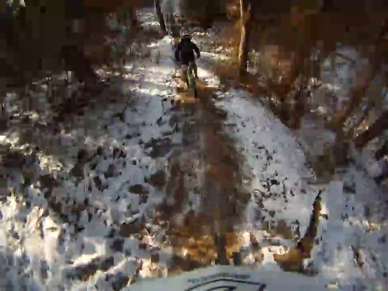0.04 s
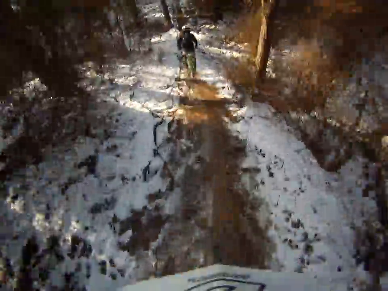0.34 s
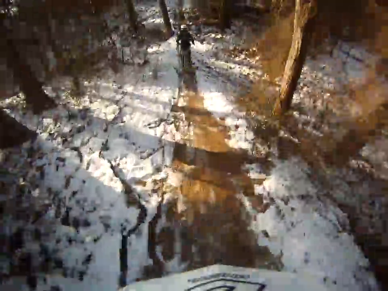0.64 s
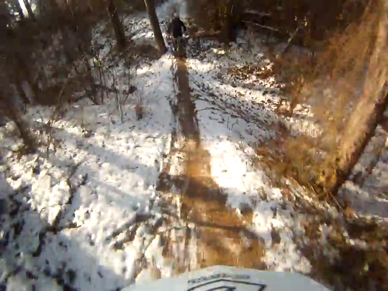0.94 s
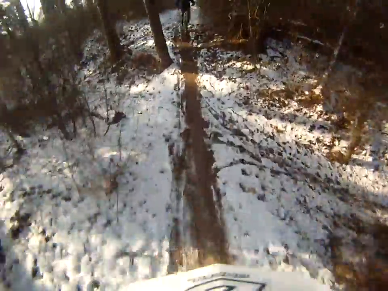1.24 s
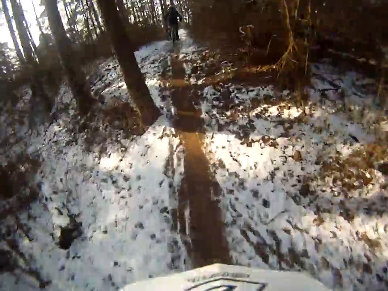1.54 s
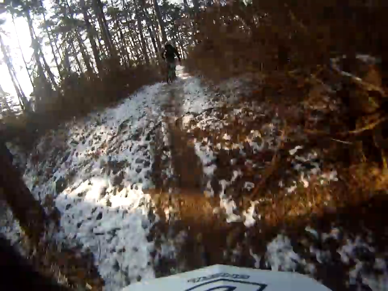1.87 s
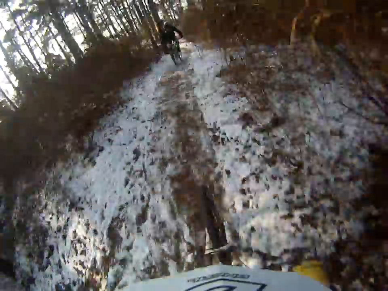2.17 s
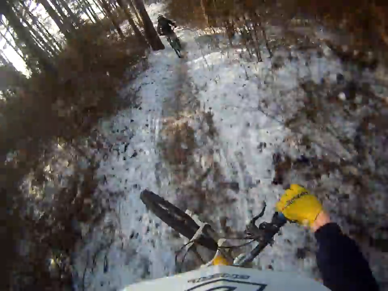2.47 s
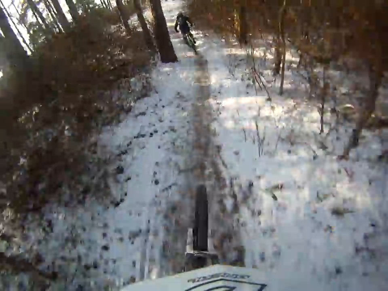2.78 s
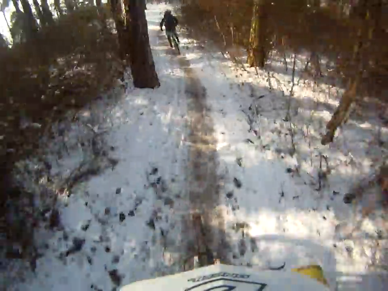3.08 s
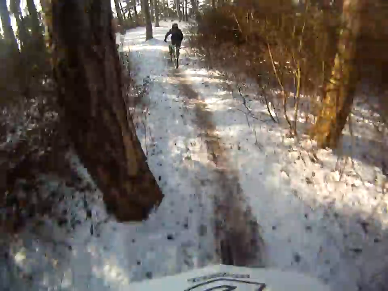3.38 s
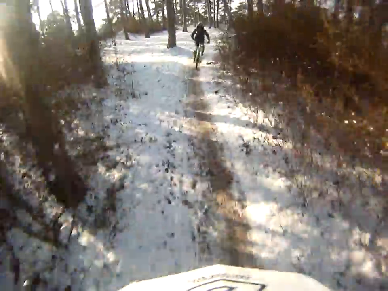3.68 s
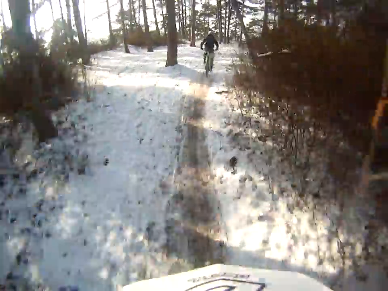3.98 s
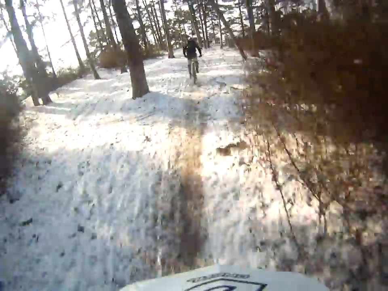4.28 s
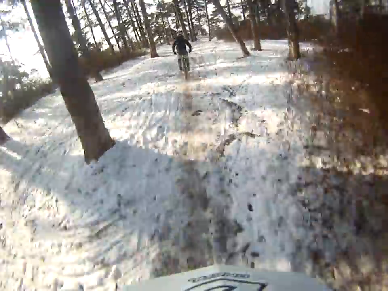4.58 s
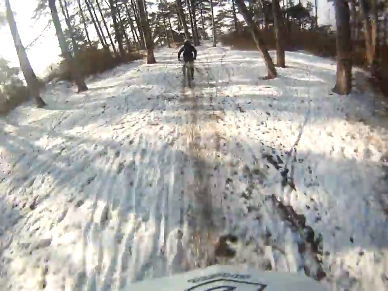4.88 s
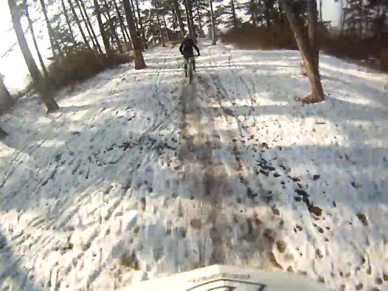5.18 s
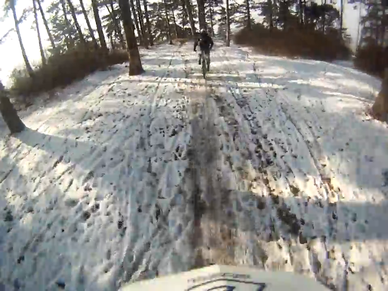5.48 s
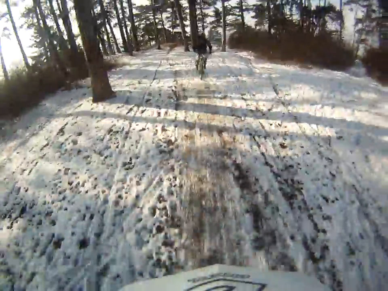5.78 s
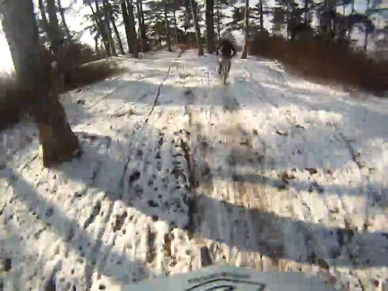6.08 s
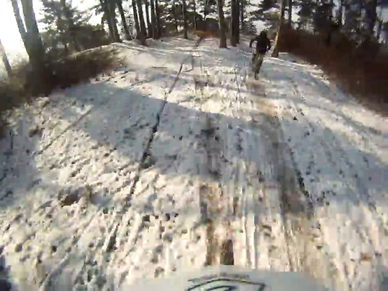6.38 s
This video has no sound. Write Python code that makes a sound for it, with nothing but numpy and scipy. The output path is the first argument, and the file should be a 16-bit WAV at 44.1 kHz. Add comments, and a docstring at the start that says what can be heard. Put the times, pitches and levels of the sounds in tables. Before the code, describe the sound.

A mountain bike rolls over snow with hissing tyres, rushing wind, low buffeting and a brief burst of very loud knocks.

```python
"""A mountain bike runs down a snowy trail, heard from a camera in a plastic housing on the helmet.
At first wind and tyre hiss ring thinly in the housing, filling out as the bike gathers speed. Knocks
and bumps follow, the mount shakes at a low rate, eddies buffet the helmet and frozen snow crunches.
Near 2.3 s a hard rattle overloads the converter, whose slow sample-and-hold mirrors all sound into
the treble. The level dips briefly, then the rush returns and the ride runs on at speed."""
import sys
import numpy as np
from scipy import signal
from scipy.fft import rfft, irfft, next_fast_len
from scipy.io import wavfile
from scipy.ndimage import map_coordinates

SR = 44100
rng = np.random.default_rng(int(sys.argv[2]) if len(sys.argv) > 2 else 0)


def materialize(psi):
    """Save the field psi as 16-bit PCM at rate SR to the path in sys.argv[1].

    A 1-D psi becomes a single channel; in a 2-D psi each row is a channel.
    """
    bounded = np.clip(np.atleast_2d(psi).T, -1, 1)
    quanta = np.round(bounded * 32767).astype(np.int16)
    wavfile.write(sys.argv[1], SR, quanta)


N = 292383


# resonances of the housing: pitch_hz, density_db
HOUSING_SPECTRUM = [(300, -31), (750, -16.5), (1000, -7.5), (1250, -1), (1600, -5.5), (1900, -0.5),
                    (2150, 2.5), (2450, -6), (2850, -19), (3150, -18), (3480, -9.5), (4000, -26),
                    (5200, -23.5), (6000, -35)]
# riding speed: time_s, speed_fraction
SPEED = [(0, 0.3), (.7, 0.44), (1.2, 1)]

def rush():
    """Cavity resonance: the housing colours smooth wind hiss and the fine grain of rolling tyres."""
    speed, = curves(SPEED)
    hiss = noise(HOUSING_SPECTRUM) * amp(0.89 * wobble(35))
    tread = coloured(grains(rate_hz=1500, spread_db=4), HOUSING_SPECTRUM)
    tread *= amp(1.4 * wobble(55) + 2.7 * wobble(19))
    full = unit(hiss + amp(-8) * tread)
    thin = unit(focused(full, centre_hz=2470, depth_db=10.5, octaves=0.7))
    return dip() * amp(rush_level() + 0.19) * (speed * full + (1 - speed) * thin)


# strength of the rush of air and tyres: time_s, level_db
RUSH_LEVELS = [(0, -57.0), (0.1, -52.5), (0.45, -49), (0.66, -50), (0.9, -46), (1.15, -38), (1.55, -36),
               (1.85, -39.5), (2.26, -41.5), (2.57, -44), (2.71, -48), (2.87, -40), (3.12, -42),
               (3.45, -39.0), (4.3, -37.5), (5.0, -37.5), (5.8, -37.5), (6.63, -38.5)]
# rougher stretches: middle_s, lift_db, half_width_s
SURGES = [(.79, 5, 0.06), (1.37, 1, 0.044), (1.65, 4, 0.038), (3.54, 1.5, .05), (4.74, 0.5, .1),
          (5.29, 2.5, 0.087), (5.68, 2.5, 0.099), (5.99, 2, 0.082), (6.32, 2, .04), (6.49, 2.5, 0.048)]

def rush_level():
    """Flow and rolling noise rise with speed and surge on rough ground; their level in dB."""
    t = np.arange(N) / SR
    surges_db = sum(lift_db * np.exp(-((t - s) / width) ** 2) for s, lift_db, width in SURGES)
    return curves(RUSH_LEVELS)[0] + surges_db


# knocks from the bike: start_s, level_db, chatter_s, centre_hz
KNOCKS = [(0.0586, -36, 0.0042, 2400), (0.132, -24, .003, 2300), (.205, -36, .003, 2400),
          (.424, -35, 0.0051, 2300), (0.713, -29.5, .008, 2200), (0.976, -30.5, .005, 2200),
          (1.026, -22, 0.0086, 1350), (1.059, -14, 0.0052, 1430), (1.363, -25.5, .006, 1800),
          (2.273, 9, .003, 1310), (2.276, 7.5, 0.0033, 2900), (2.2965, -17.5, 0.0073, 1700),
          (2.3175, 4.5, 0.0036, 3400), (2.3195, -6.5, 0.0015, 1790), (2.338, -25.5, 0.013, 1900),
          (2.363, -8, 0.0064, 2200), (2.372, -20.5, 0.0057, 1890), (2.384, -14, 0.0033, 1900),
          (2.394, -14, 0.0054, 1495), (2.98, -20.5, 0.0042, 1500), (2.9872, -13, 0.0012, 1480),
          (3.05, -24, 0.0027, 1490), (4.682, -21.5, 0.0039, 2300)]
# modes that a knock excites: pitch_hz, level_db, t60_s
KNOCK_MODES = [(640, -15.5, 0.014), (857, -25, 0.089), (1130, -2.5, 0.032), (1270, -15, 0.0084),
               (1548, 3.5, 0.014), (1986, -8.5, 0.025), (2400, -7, 0.027), (3463, -10.5, 0.024),
               (3646, -16.5, 0.032), (5300, -22, .015)]
# chatter within a knock: pitch_hz, density_db
CHATTER_SPECTRUM = [(300, -20.5), (650, -18.5), (900, -20.5), (1100, -0.5), (1600, -1.5), (2250, 1.5),
                    (2800, -17.5), (3450, -5), (4300, -15), (6000, -22.5)]

def knocks():
    """Impact excitation: damped modes ring, the contact chatters, the struck spot favours one band."""
    track, t = np.zeros(N), np.arange(SR // 10) / SR
    chatter = noise(CHATTER_SPECTRUM)
    hz, mode_db, t60 = np.transpose(KNOCK_MODES)[:, :, None]
    attack = 1 - np.exp(-t / 0.00029)
    for start_s, level_db, chatter_s, centre_hz in KNOCKS:
        strength = amp(mode_db + rng.standard_normal(hz.shape)) * rng.choice([-1, 1], hz.shape)
        modes = strength * np.sin(2 * np.pi * hz * t) * amp(-60 * t / t60)
        ring = attack * modes.sum(axis=0)
        rattle = hold_and_decay(t, chatter_s, t60_s=0.017) * chatter[round(start_s * SR):][:len(t)]
        padded = np.pad(amp(-3.5) * ring + amp(-5) * rattle, (len(t), 0))
        clack = focused(padded, centre_hz)[len(t):]
        add(track, start_s, amp(level_db) * clack)
    return track


# hard blows that reach the housing: start_s, level_db, pitch_hz
THUDS = [(1.027, -24.5, 400), (2.273, 3, 560), (2.3185, 0.5, 250), (2.363, -23, 500), (2.9872, -20, 250)]

def thuds(t60_cycles=2.1):
    """Heavy damping: the housing answers a hard blow with a dull thump of about two cycles."""
    track, t = np.zeros(N), np.arange(SR // 10) / SR
    for start_s, level_db, pitch_hz in THUDS:
        cycles = pitch_hz * t
        thump = np.sin(2 * np.pi * cycles) * amp(-60 * cycles / t60_cycles)
        add(track, start_s, amp(level_db) * thump)
    return track


# bumps in the trail: start_s, level_db, length_s
BUMPS = [(.63, -27, .02), (1.03, -22.5, 0.057), (1.28, -24.5, 0.021), (1.57, -30, 0.098),
         (1.93, -25.5, 0.017), (2.07, -26.5, 0.093), (2.91, -14.5, 0.096), (4.03, -27, 0.037),
         (4.72, -22.5, 0.02), (5.09, -26, 0.025), (5.28, -28.5, 0.06), (5.78, -27, .04), (6.33, -23, 0.025)]
# irregular sway of the mount: pitch_hz, density_db
SWAY_SPECTRUM = [(5, 0.5), (18, -4.5), (30, -13), (42, -15.5), (60, -7), (120, -61)]

def mount(natural_hz=31.5):
    """Forced vibration: the trail shakes the springy mount near its natural frequency, more on bumps."""
    tremble = dip() * follow_rush(cruise_db=-33, slope=0.36) * unit(1.55 + wobble(20))
    jolts = swells(BUMPS, rise_s=0.13, t60_s=0.69)
    shake_hz = natural_hz + 2.64 * wobble(13)
    swing = np.sqrt(2) * np.sin(2 * np.pi * np.cumsum(shake_hz) / SR)
    return np.hypot(tremble, jolts) * unit(swing + amp(-13) * noise(SWAY_SPECTRUM))


# strong eddies that hit the helmet: start_s, level_db, length_s
EDDIES = [(.385, -40, 0.01), (.825, -41, 0.017), (1.055, -36, 0.016), (1.34, -43, 0.031),
          (1.57, -36.5, .02), (2.035, -31, 0.024), (2.14, -40, 0.038), (2.95, -35, 0.082), (3.89, -41, .02),
          (4.16, -36, 0.014), (5.275, -41, .015), (5.99, -45, .015), (6.2, -39, .015), (6.3, -35, 0.013),
          (6.42, -38, .03)]
# low buffeting of the air: pitch_hz, density_db
BUFFET_SPECTRUM = [(30, -7), (55, 0), (80, -7.5), (105, -0.5), (118, -5), (134, 2.5), (155, -6.5),
                   (200, -21.5), (400, -28.5)]
# smoother roar of the air: pitch_hz, density_db
ROAR_SPECTRUM = [(80, -2.5), (200, 2), (350, -1.5), (600, -4), (900, -3.5), (2000, -18)]

def wind(doubling_db=-36):
    """Turbulence: eddies thump on the helmet in lumps over a smoother roar; both grow with the rush."""
    eddies = swells(EDDIES, rise_s=0.04, t60_s=0.2)
    lumps = follow_rush(cruise_db=-48.5, slope=0.55) * unit(amp(1.2 * np.minimum(wobble(22), 1.3)))
    buffet = np.hypot(lumps, eddies) * noise(BUFFET_SPECTRUM)
    # an eddy at doubling_db doubles the power of the roar
    roar_gain = follow_rush(cruise_db=-51, slope=0.94) * np.hypot(1, eddies / amp(doubling_db))
    return buffet + dip() * roar_gain * noise(ROAR_SPECTRUM)


# patches of frozen snow breaking: start_s, relative_db, length_s
CRUNCHES = [(0.056, -49, .006), (0.205, -50.5, 0.01), (0.45, -47, 0.01), (0.483, -37, 0.0055),
            (0.501, -38, 0.024), (.621, -42, 0.005), (0.901, -38, 0.0098), (0.972, -35.5, 0.019),
            (1.036, -40, 0.014), (1.178, -34.5, .012), (1.368, -36, 0.0093), (1.621, -38.5, 0.011),
            (1.919, -41, 0.031), (2.333, -22, .004), (2.466, -48.5, 0.0026), (2.561, -50, 0.0074),
            (2.881, -40, 0.014), (2.934, -37, 0.027), (3.354, -43, 0.0099), (3.688, -43, .008),
            (3.726, -43, 0.0089), (4.002, -38, 0.0084), (4.142, -41, .006), (4.187, -37, 0.014),
            (4.528, -41, .012), (4.747, -38, 0.0033), (4.77, -41, .01), (4.848, -40, 0.018),
            (5.221, -38, .008), (5.244, -41, 0.023), (5.48, -44, 0.013), (5.705, -45, .02),
            (6.155, -40, .015), (6.196, -35, 0.009), (6.265, -41, 0.024), (6.327, -34, .004)]
# loose grit under the tyres: time_s, relative_db
GRIT_LEVELS = [(0, -66), (.95, -66), (1.2, -60), (1.6, -52), (1.85, -68.5), (2.6, -73), (3.25, -76),
               (3.6, -66), (4.2, -56), (5.05, -60), (5.75, -53.5), (6.63, -62)]
# fractures in the crust: pitch_hz, density_db
CRUST_SPECTRUM = [(500, -30), (1500, 5), (3500, 6), (5000, -2), (6000, -7.5)]

def snow():
    """Brittle fracture: tyres break the crust in bright clusters of clicks; grit crackles between."""
    pressure, t = np.zeros(N), np.arange(SR // 10) / SR
    for start_s, relative_db, length_s in CRUNCHES:
        add(pressure, start_s, amp(relative_db) * hold_and_decay(t, length_s, t60_s=0.021))
    grit_db, = curves(GRIT_LEVELS)
    grit = dip() * amp(grit_db + 2.5) * unit(amp(5.2 * np.minimum(wobble(50), 1.5)))
    fractures = coloured(grains(rate_hz=4000, spread_db=2.5), CRUST_SPECTRUM)
    return (amp(-4.5) * pressure + grit) * fractures


def follow_rush(cruise_db, slope, cruise_rush_db=-38):
    """Power law: a layer's gain moves from cruise_db by slope dB for each dB of rush."""
    return amp(cruise_db + slope * (rush_level() - cruise_rush_db))


def dip(start_s=2.42, depth_db=-22.5, fall_s=0.025, hold_s=0.047, return_s=0.075):
    """Attenuation: the level drops briefly after the hard knocks, holds and returns."""
    t = np.arange(N) / SR - start_s
    depth = np.minimum(1 + t / fall_s, 1 - (t - hold_s) / return_s)
    return amp(depth_db * np.clip(depth, 0, 1))


def swells(rows, rise_s, t60_s):
    """Incoherent addition: events that rise, hold and die away sum in power to one envelope."""
    t, power = np.arange(N) / SR, np.zeros(N)
    for start_s, level_db, length_s in rows:
        fade = np.maximum((start_s - t) / rise_s, (t - start_s - length_s) / t60_s)
        power += amp(level_db - 60 * np.clip(fade, 0, 2)) ** 2
    return np.sqrt(power)


def hold_and_decay(t, hold_s, t60_s):
    """Exponential decay after a steady hold."""
    return amp(-60 * np.maximum(t - hold_s, 0) / t60_s)


def grains(rate_hz, spread_db):
    """Shot noise: impulses at random moments and of uneven size, at rms 1."""
    impulses = (rng.random(N) < rate_hz / SR) * rng.standard_normal(N)
    return unit(impulses * amp(spread_db * rng.standard_normal(N)))


def noise(spectrum):
    """Steady coloured noise at rms 1."""
    return coloured(rng.standard_normal(N), spectrum)


def coloured(x, spectrum):
    """Spectral shaping by (pitch_hz, density_db) points, at rms 1."""
    pitch_hz, db = np.transpose(spectrum)
    return unit(filtered(x, lambda hz: amp(np.interp(np.log(hz + 1), np.log(pitch_hz), db, right=-120))))


def focused(x, centre_hz, depth_db=12, octaves=0.75):
    """Band emphasis: pitches far from centre_hz fall by depth_db."""
    distance = np.log2((np.fft.rfftfreq(len(x), 1 / SR) + 1) / centre_hz) / octaves
    return irfft(rfft(x) * amp(depth_db * (np.exp(-distance ** 2) - 1)), len(x))


def filtered(x, response):
    """Linear filtering: the spectrum times a frequency response."""
    size = next_fast_len(N + SR // 2)
    return irfft(rfft(x, size) * response(np.fft.rfftfreq(size, 1 / SR)), size)[:N]


def wobble(rate_hz):
    """Random modulation: a smooth curve through rate_hz knots a second."""
    knots = rng.standard_normal(int(N * rate_hz / SR) + 4)
    return map_coordinates(knots, [np.arange(N) * rate_hz / SR])


def curves(rows):
    """Linear interpolation: one value per sample for each column after the time."""
    time_s, *columns = np.transpose(rows)
    return [np.interp(np.arange(N) / SR, time_s, column) for column in columns]


def add(track, start_s, sound):
    """Mix a sound into a track at start_s."""
    part = track[round(start_s * SR):][:len(sound)]
    part += sound[:len(part)]


def amp(db):
    """Decibels to gain."""
    return 10 ** (np.asarray(db) / 20)


def unit(x):
    """Scale to rms 1."""
    return x / np.sqrt(np.mean(x ** 2) + 1e-20)


def scene():
    """Superposition: all sources add at the one microphone inside the housing."""
    return (rush() + knocks() + thuds() + mount() + wind() + snow())[None]


def record(dry):
    """Spectral imaging: a slow converter clips and holds each sample, mirroring sound about its rate."""
    hold_hz, cutoff_hz = 12000, 15350
    slow = signal.resample_poly(dry[0], hold_hz, SR, window=("kaiser", 8))
    held = np.repeat(np.clip(slow, -1, 1), 4)
    mirrored = signal.resample_poly(held, SR, 4 * hold_hz)[:N]
    return filtered(mirrored, lambda hz: 1 / np.sqrt(1 + (hz / cutoff_hz) ** 160))[None]


dry = scene()
out = record(dry)
materialize(out)
```